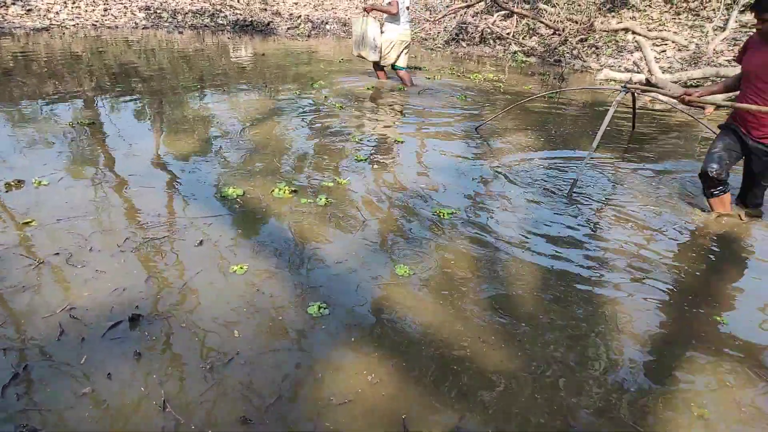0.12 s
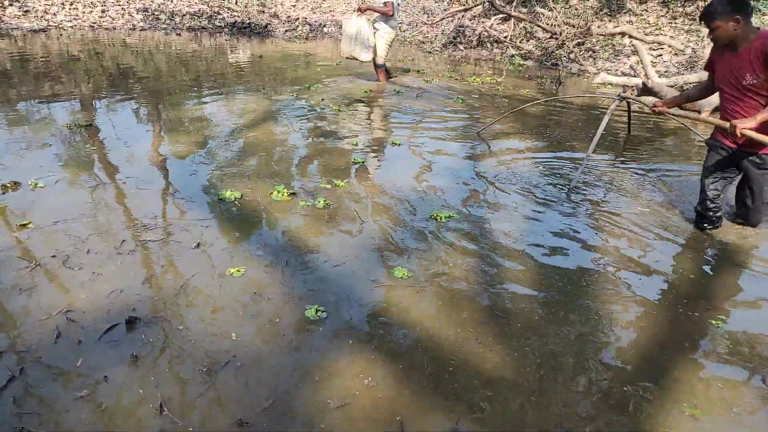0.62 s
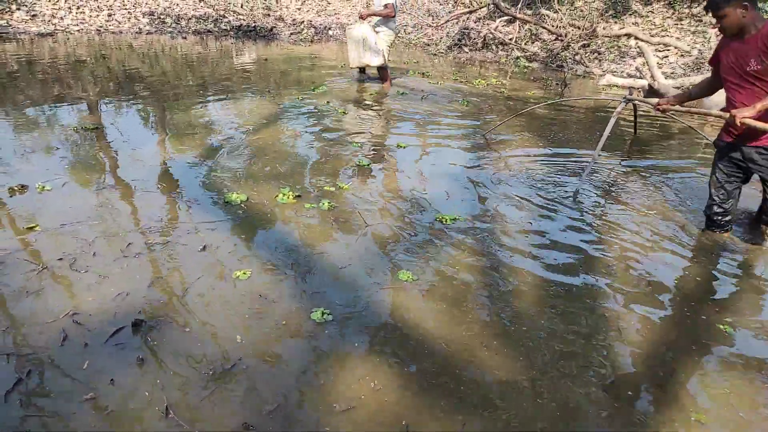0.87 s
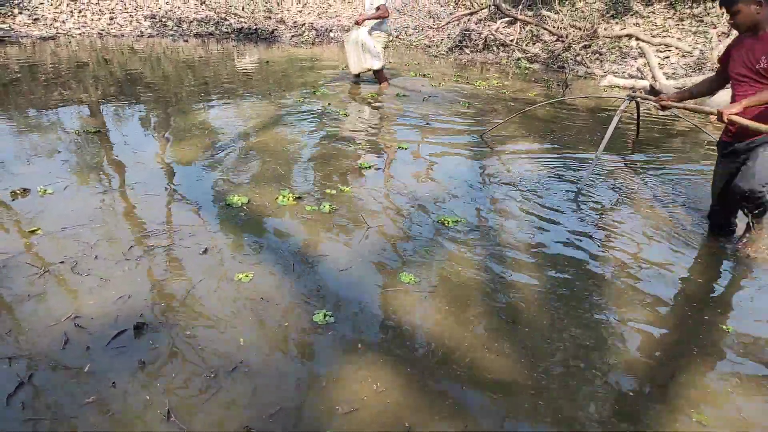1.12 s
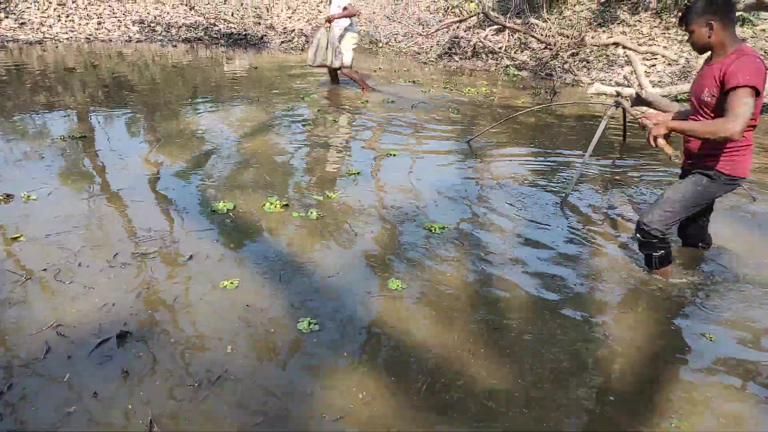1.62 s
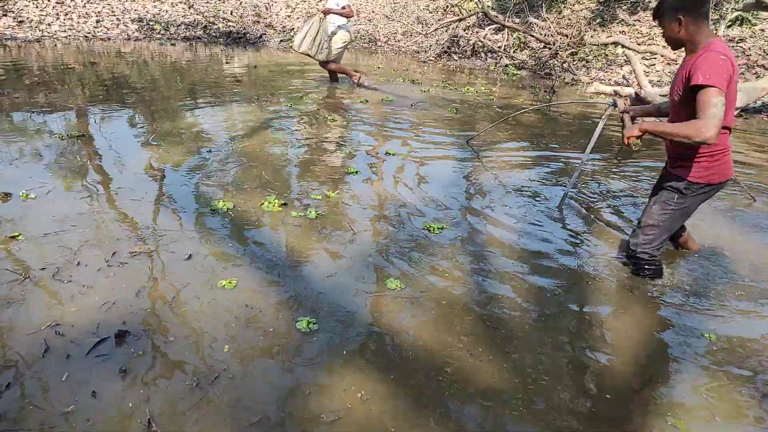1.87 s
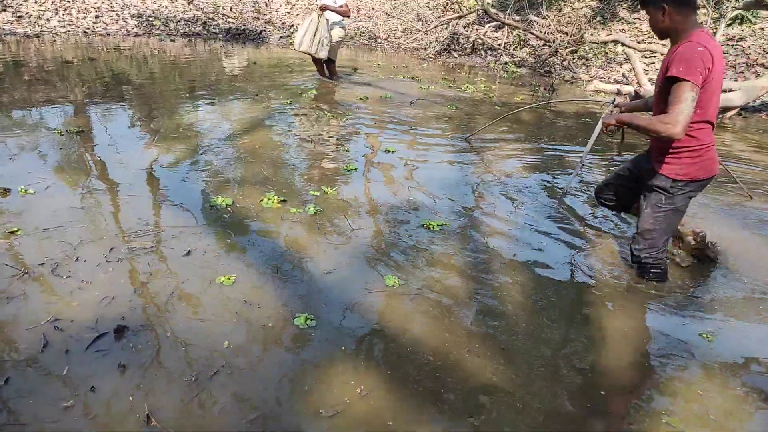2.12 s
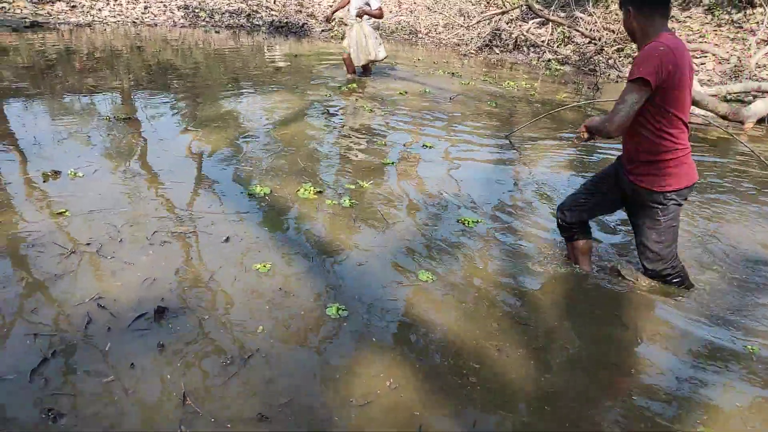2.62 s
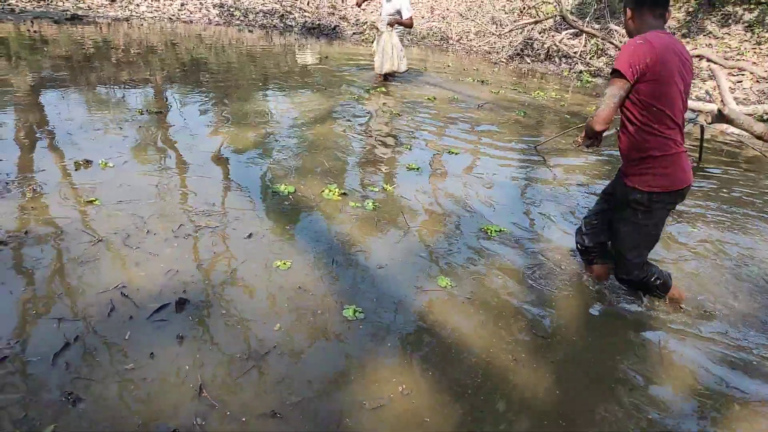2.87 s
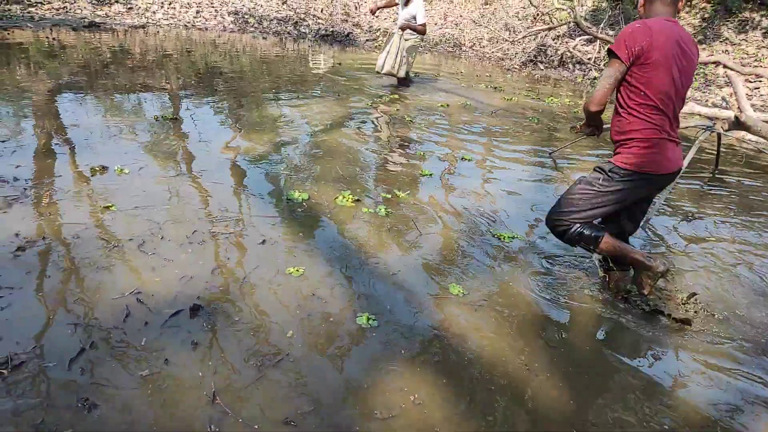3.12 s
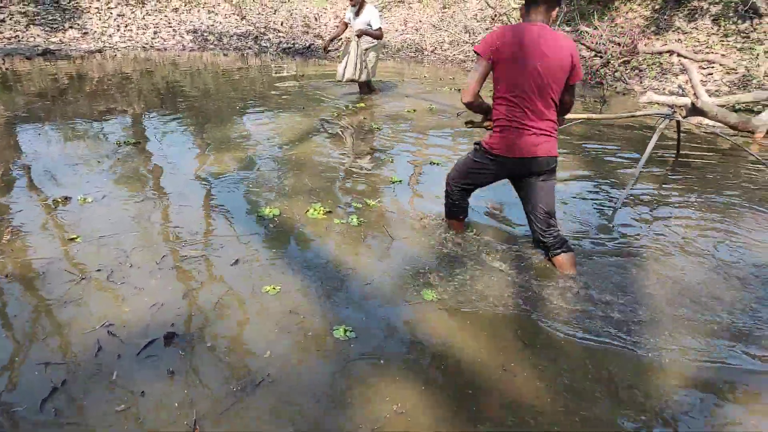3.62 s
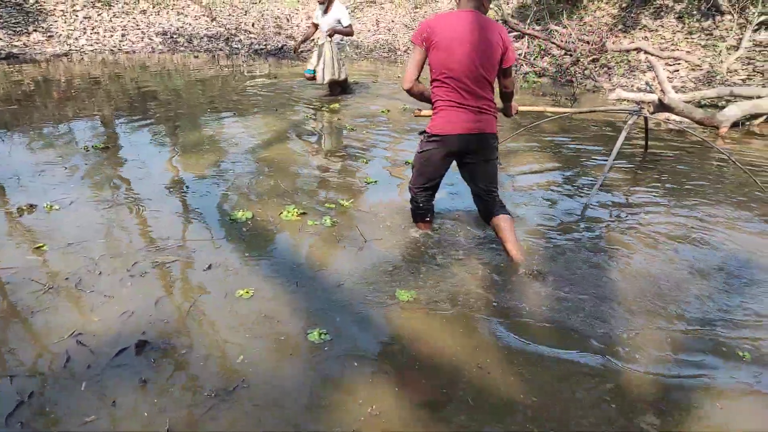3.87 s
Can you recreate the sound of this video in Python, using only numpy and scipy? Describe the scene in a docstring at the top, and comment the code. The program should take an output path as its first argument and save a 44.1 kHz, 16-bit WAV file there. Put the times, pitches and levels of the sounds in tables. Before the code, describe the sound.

Legs wade through a shallow pond with gurgles, plops and fine fizzing splashes, growing busier; a bird trills on one pitch from midway, over a slowly nearing distant engine and soft outdoor hiss, in phone stereo.

```python
"""Wading through a pond

Legs wade through a shallow pond: ringing bubbles make it gurgle, plop and fizz at each push.
A bird trills on one pitch in the trees, another whistles twice: swelling tones with echoes.
An engine far off hums and rumbles, a wavering tone over coloured noise, coming closer under a hiss.
A phone's two microphones, some way apart, take it in."""
import sys
import numpy as np
from scipy import signal
from scipy.fft import rfft, irfft
from scipy.io import wavfile

SR = 44100
rng = np.random.default_rng(int(sys.argv[2]) if len(sys.argv) > 2 else 0)


def undo_db(level):
    """Turn decibels back into plain size, where 20 dB means ten times bigger."""
    steps = np.asarray(level, float) / 20
    return 10 ** steps


def persist_wave(psi):
    """Save psi, clipped to +-1, as 16-bit WAV."""
    counts = np.round(np.clip(psi, -1, 1) * 32767).astype(np.int16)
    wavfile.write(sys.argv[1], SR, np.atleast_2d(counts).T)


N = 176400
T = np.arange(N) / SR
HZ = np.arange(N // 2 + 1) * SR / N


def in_time(rows):
    """Linear interpolation: columns of a table, one value per sample."""
    s, *columns = np.transpose(rows)
    return [np.interp(T, s, c) for c in columns]


def at_hz(points, hz):
    """Spectral interpolation: reads a table on a log-frequency axis."""
    table_hz, values = np.transpose(points)
    return np.interp(np.log(hz + 1e-9), np.log(table_hz), values)


def rms_one(x):
    """Power normalisation: scales to rms 1."""
    return x / np.sqrt(np.mean(x ** 2) + 1e-20)


def drift(rate_hz):
    """Low-passed noise: a slow random wander of spread 1."""
    # two equal poles, run at a fortieth of the sample rate
    r = np.exp(-80 * np.pi * rate_hz / SR)
    slow = signal.lfilter([1], [1, -2 * r, r * r], rng.standard_normal(N // 40 + 2002))[2000:]
    return np.interp(np.arange(N) / 40, np.arange(len(slow)), rms_one(slow))


# Coherence of the two channels: (frequency [Hz], left-right likeness [0 to 1])
LIKENESS = [(60, 1), (250, 1), (500, 0.89), (1000, 0.097), (2500, 0.48), (5000, 0.047), (8000, 0.26),
            (15000, 0.033)]


def stereo(pair):
    """Coherence: two unrelated sounds become left and right, alike in the bass, apart in the treble."""
    alike = np.clip(at_hz(LIKENESS, HZ), 0, 1)
    mid, side = rfft(pair)
    left_right = np.sqrt(1 + alike) * mid + np.sqrt(1 - alike) * side * [[1], [-1]]
    return irfft(left_right, N) / np.sqrt(2)


def noise(colour):
    """Spectral shaping: white noise filtered to a colour, in stereo, rms 1."""
    white = rfft(rng.standard_normal((2, N)))
    return rms_one(stereo(irfft(white * undo_db(at_hz(colour, HZ)), N)))


def add(out, s, sound):
    """Superposition: lays a short sound in at its time."""
    i = int(s * SR)
    out[..., i:i + len(sound)] += sound[:N - i]


def glide(s, length, db, hz):
    """Frequency modulation: a soft tone on a moving pitch, swelling and fading."""
    swell = np.sin(np.pi * np.clip((T - s) / length, 0, 1)) ** 2
    return undo_db(db) * swell * np.sin(2 * np.pi * np.cumsum(hz) / SR)


def grains(per_s, vigour_db, colour, cycles, spread_db, patchy_db, low_hz, high_hz):
    """Bubble resonance: random impulses, denser when the water is stirred, ring 24 damped resonators."""
    swing_db = vigour_db - vigour_db.mean()
    signs = rng.choice([-1, 1], (2, N))
    strengths = undo_db(spread_db * np.minimum(rng.exponential(1, (2, N)), 5)) * signs
    born = rng.random((2, N)) < per_s * undo_db(swing_db) / SR
    dealt = rng.integers(0, 24, (2, N))  # which resonator each bubble rings
    clumps = [drift(6.0) for _ in range(7)]  # six pitch regions, and one shared
    out = 0
    for k, hz in enumerate(np.geomspace(low_hz, high_hz, 24)):
        r, w = undo_db(-60 * hz / (cycles * SR)), 2 * np.pi * hz / SR
        # the same resonator twice in a row, so each bubble swells before it dies
        twice = [[1 - r * r, 0, r * r - 1, 1, -2 * r * np.cos(w), r * r]] * 2
        ring = signal.sosfilt(twice, strengths * born * (dealt == k) + 1e-18)
        clump_db = patchy_db * (clumps[k // 4] + 0.18 * clumps[-1])
        out = out + undo_db(at_hz(colour, hz) + clump_db) * ring
    # the density has already raised the level by half the swing
    return undo_db(vigour_db) * rms_one(stereo(out) * undo_db(-swing_db / 2))


# Fine spray from the legs: (time [s], level before the layer's offset [dB])
SPRAY = [(0.0, -67.5), (0.15, -50.5), (0.67, -57.5), (0.76, -47), (0.85, -50.5), (0.97, -45.5),
         (1.15, -50.5), (1.31, -53), (2.07, -50), (2.29, -45.5), (2.33, -51), (2.51, -44.5), (2.83, -53.5),
         (3.25, -43), (3.29, -41), (3.32, -45.5), (3.62, -42.5), (3.75, -53.5), (4.0, -47)]
# Spectrum of the spray: (frequency [Hz], relative level [dB])
SPRAY_COLOUR = [(2800, -0.5), (3600, -6), (4400, -5.5), (5600, -7.5), (7300, 3), (8600, -7.5),
                (10600, -45.5), (14000, -21.5)]


def spray():
    """Resonance at high pitches: a dense fizz, with sparser, shorter drips ticking in it."""
    spray_db, = in_time(SPRAY)
    fizz = grains(3500., spray_db - 1, SPRAY_COLOUR, cycles=21.8, spread_db=2.5,
                  patchy_db=1.5, low_hz=2788, high_hz=15660)
    crackle = grains(500., spray_db - 5, SPRAY_COLOUR, cycles=7., spread_db=3.,
                     patchy_db=1.5, low_hz=3770, high_hz=9250)
    return fizz + crackle


# Water folding round the shins: (time [s], level before a fixed offset [dB])
GURGLE = [(0, -63.5), (.35, -52), (.62, -58), (.78, -48), (1.0, -49.5), (1.2, -53), (1.46, -48), (1.6, -53),
          (2.0, -46), (2.35, -48), (2.51, -44.5), (2.59, -44.5), (2.63, -46.5), (2.97, -62), (3.05, -43.5),
          (3.16, -48), (3.3, -44), (3.45, -44.5), (3.62, -39), (3.72, -46), (3.88, -55), (3.97, -40)]
# Spectrum of the gurgle: (frequency [Hz], relative level [dB])
GURGLE_COLOUR = [(350, -6.5), (600, 0.5), (1000, 1.5), (1400, -4), (2000, -5), (2800, -8)]


def gurgle():
    """Bubble resonance: lower ringing pitches, struck at close to one loudness."""
    gurgle_db, = in_time(GURGLE)
    return grains(600., gurgle_db + 1.5, GURGLE_COLOUR, cycles=22.4, spread_db=0.57,
                  patchy_db=2., low_hz=403.3, high_hz=2600)


def gloop():
    """Cavity resonance: a hollow fills, its pitch climbing."""
    start_s, length_s, level_db, start_hz, octaves = 1.325, .11, -44.5, 255, 1.75
    filled = np.clip((T - start_s) / length_s, 0, 1)
    tone = glide(start_s, length_s, level_db, start_hz * 2 ** (octaves * filled))
    return undo_db(2.0 * drift(26.0)) * tone


# Single bubbles: (time [s], level before onset and decay [dB], starting pitch [Hz])
PLOPS = [(0.133, -32.5, 960), (0.338, -26.5, 1470), (0.342, -31, 1060), (0.361, -33, 990), (1.33, -24, 144),
         (1.45, -28.5, 1020), (1.999, -33, 856), (2.497, -26.5, 990), (2.515, -28, 990),
         (2.591, -21.5, 1100), (2.596, -25, 1650), (3.04, -26, 1140), (3.072, -27.5, 580),
         (3.259, -20, 1730), (3.26, -29, 1220), (3.311, -28, 950), (3.37, -28.5, 695), (3.426, -21, 1040),
         (3.472, -28, 1740), (3.509, -40, 1020), (3.522, -24, 1890), (3.562, -26, 1700), (3.566, -26, 916),
         (3.615, -46, 880), (3.66, -26.5, 1410), (3.952, -25.5, 970)]


def plops():
    """Free oscillation of a bubble: a damped sine whose pitch climbs as it rings."""
    decay_cycles, rise_per_cycle = 15.1, 0.0046  # cycles to fall 60 dB; share of the starting pitch
    out, t = np.zeros(N), T[:SR // 10]
    for s, db, hz in PLOPS:
        cycles = hz * t
        envelope = undo_db(db - 60 * cycles / decay_cycles) * (1 - np.exp(-2 * cycles))
        turns = cycles * (1 + rise_per_cycle * cycles / 2)
        add(out, s, envelope * np.sin(2 * np.pi * turns))
    return out


# Drops land: (time [s], level before onset and decay [dB], pitch [Hz], splat relative level [dB])
DROPS = [(0.2138, -31, 7950, -8), (1.349, -32.5, 2400, -23), (2.181, -34, 7750, -8), (2.28, -31, 3620, -20),
         (3.079, -28.5, 3130, -27), (3.0795, -30, 3620, -20), (3.1225, -34, 8730, -23),
         (3.273, -36, 6360, -18)]


def drops():
    """Impact excitation: a damped tone and a bright noise splat share one decay."""
    decay_s, onset_s = .018, 0.000095  # time to fall 60 dB; time constant
    out, t = np.zeros(N), T[:SR // 10]
    envelope = undo_db(-60 * t / decay_s) * (1 - np.exp(-t / onset_s))
    splats = np.diff(rng.standard_normal((len(DROPS), len(t) + 1)))  # differencing brightens
    for (s, db, hz, splat_db), splat in zip(DROPS, splats):
        tone = np.sin(2 * np.pi * hz * t)
        add(out, s, undo_db(db) * envelope * (tone + undo_db(splat_db) * splat))
    return out


def water():
    """Superposition: fizz and gurgle under the legs' push, with a gloop, single plops and drops."""
    return spray() + gurgle() + gloop() + plops() + drops()


# The trill's swell and sag: (time [s], note's peak level [dB], pitch at the note's middle [Hz])
TRILL = [(1.8, -52, 2430), (1.9, -43, 2440), (2.3, -37.5, 2430), (3.03, -32.5, 2450), (3.47, -32, 2435),
         (3.65, -36, 2390), (3.72, -44, 2300)]
# Middles of the trill's notes: (time [s])
TRILL_NOTES = [1.772, 1.824, 1.887, 1.959, 2.027, 2.094, 2.163, 2.233, 2.305, 2.375, 2.442, 2.514, 2.583,
               2.647, 2.715, 2.785, 2.863, 2.93, 3.002, 3.072, 3.144, 3.217, 3.289, 3.362, 3.434, 3.502,
               3.578, 3.653, 3.719]


def trill():
    """Frequency modulation: short bell-shaped notes each scoop up in pitch."""
    rise_s, fall_s, scoop_hz, scoop_s = .0098, .011, 38., .012
    out, t = np.zeros(N), T[:SR // 10] - .05
    shape = np.exp(-.5 * (t / np.where(t < 0, rise_s, fall_s)) ** 2)
    scoop = scoop_hz * (1 - np.exp(-np.clip(t / scoop_s, -2, 9)))
    level_db, hz = in_time(TRILL)
    for s in TRILL_NOTES:
        i = int(s * SR)
        note = shape * np.sin(2 * np.pi * np.cumsum(hz[i] + scoop) / SR)
        add(out, s + t[0], undo_db(level_db[i]) * note)
    return out


# Second bird: (start [s], length [s], mean level at the peak [dB], starting pitch [Hz], rise [Hz])
WHISTLES = [(-.01, .05, -51, 3050, 60.), (.18, .22, -53, 2910, 420.)]


def whistles():
    """Frequency modulation: two thin rising tones, unsteady in pitch and level."""
    out = np.zeros(N)
    for s, length, db, start_hz, rise_hz in WHISTLES:
        hz = start_hz + rise_hz * (T - s) / length + 25 * drift(40.0)
        out += undo_db(3 * drift(50.0)) * glide(s, length, db, hz)
    return out


# Echoes off the trees: (longest delay [s], relative level [dB])
TREES = [(.024, -18), (.038, -20), (.056, -21), (.095, -24)]


def birds():
    """Discrete reflections: both birds echo off the trees, at unequal delays on each side."""
    song = trill() + whistles()
    both = np.array([song, song])
    for delay, db in TREES:
        for side in range(2):
            add(both[side], delay * rng.uniform(0.71, 1.0), undo_db(db) * song)
    return both


# Engine's firing tone: (time [s], mean pitch [Hz], mean rms level [dB])
HUM = [(0.0, 51.83, -46.5), (0.27, 47.7, -45), (0.9, 48.0, -44.5), (2.49, 48, -41), (3.45, 47.15, -37.5),
       (4.0, 44.8, -37)]


def hum():
    """Periodic firing: one sine, wavering in pitch and level."""
    hz, hum_db = in_time(HUM)
    wavering_hz = hz + 0.826 * drift(1.56)
    tone = np.sin(2 * np.pi * np.cumsum(wavering_hz) / SR)
    return np.sqrt(2) * undo_db(hum_db + 2.0 * drift(2.6)) * tone


# Engine rumble: (time [s], level of the lower part [dB], upper part relative level [dB])
RUMBLE = [(0.0, -45, -7.5), (0.2, -46, -7), (1.24, -41, -6.5), (2.08, -40, -8), (2.23, -40.5, -1),
          (3.71, -35.5, -6.5), (3.74, -32.5, -13), (4.0, -36, -3)]
# Spectrum of the lower part: (frequency [Hz], relative density [dB per Hz])
LOWER_COLOUR = [(12, -58), (20, -38), (32, -2.5), (48, -2), (59, -4.5), (76, -6), (166, -1.5), (215, -12.5),
                (280, -36.5), (470, -120)]
# Spectrum of the upper part: (frequency [Hz], relative density [dB per Hz])
UPPER_COLOUR = [(120, -20), (205, -4.5), (258, -2.5), (441, -16), (480, -13), (620, -39), (1060, -120)]


def rumble():
    """Broadband noise and pipe resonance: two coloured bands and a narrow drone."""
    drone_hz, width_hz, drone_db = 168.3, 9.6, -7.5
    resonance = 1 / (1 + (2 * (HZ - drone_hz) / width_hz) ** 2)
    drone = rms_one(irfft(rfft(rng.standard_normal(N)) * resonance, N))
    rumble_db, upper_db = in_time(RUMBLE)
    lower, upper = noise(LOWER_COLOUR), noise(UPPER_COLOUR)
    return undo_db(rumble_db) * (lower + undo_db(upper_db) * upper + undo_db(drone_db) * drone)


def engine():
    """Superposition: a wavering firing tone over a rumble."""
    return hum() + rumble()


# Spectrum of the outdoor hiss: (frequency [Hz], relative density [dB per Hz])
AIR = [(210, -51), (350, -23), (530, -6), (613, -3), (664, -4.5), (804, -5.5), (1010, -3), (1120, -7.5),
       (1970, -11), (3670, -21), (7920, -13.5), (10600, -29), (16000, -45)]


def air():
    """Broadband noise: a coloured outdoor hiss near -47 dB, drifting slightly."""
    return undo_db(-47 + .5 * drift(7.9)) * noise(AIR)


def late_left(x, lag_s):
    """Time difference of arrival: a linear phase shift delays the left channel."""
    return irfft(rfft(x) * np.exp(-2j * np.pi * HZ * lag_s * np.array([[1], [0]])), N)


def scene():
    """Superposition: water, and the far sounds, which lag more at the left microphone."""
    far = birds() + engine() + air()
    return late_left(water(), .0001) + late_left(far, 0.000391)


def band_limit(x):
    """A steep low-pass at the top of the band."""
    return signal.sosfilt(signal.butter(12, 15800, fs=SR, output="sos"), x)


# Balance of the microphones: (frequency [Hz], left over right [dB])
LEFT_LOUDER = [(60, 8.5), (130, 10.5), (290, 7.5), (640, 10.5), (1410, 2.5), (3100, 5), (6820, -2.5),
               (15000, 3.5)]


def record(dry):
    """Frequency response: the left microphone takes more bass; the two gains average one."""
    tilt = at_hz(LEFT_LOUDER, HZ) / 2
    ports = np.array([undo_db(tilt), undo_db(-tilt)]) * 2 / (undo_db(tilt) + undo_db(-tilt))
    mix = irfft(rfft(dry) * ports, N)
    return band_limit(mix)


dry = scene()
out = record(dry)
persist_wave(out)
```